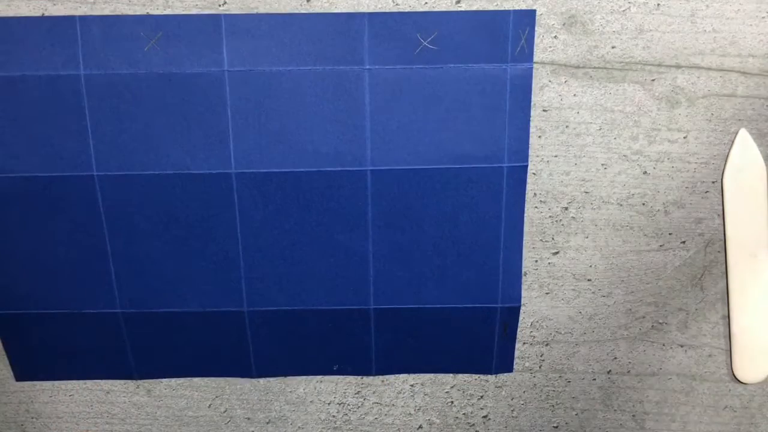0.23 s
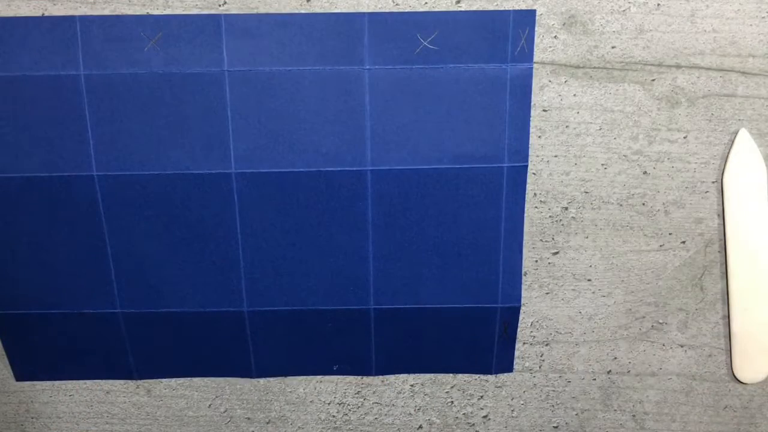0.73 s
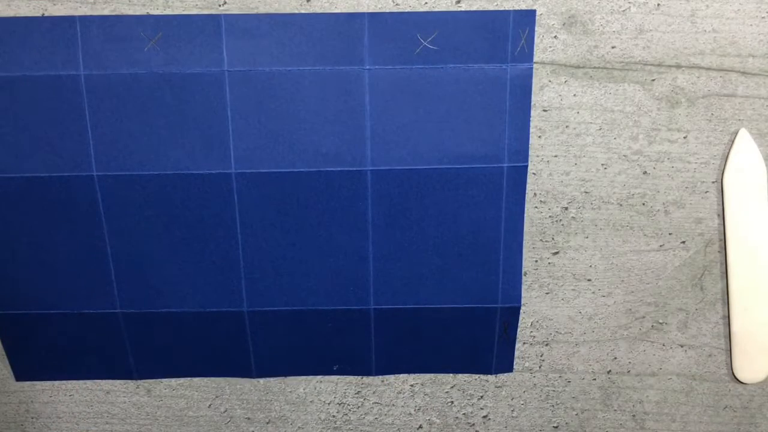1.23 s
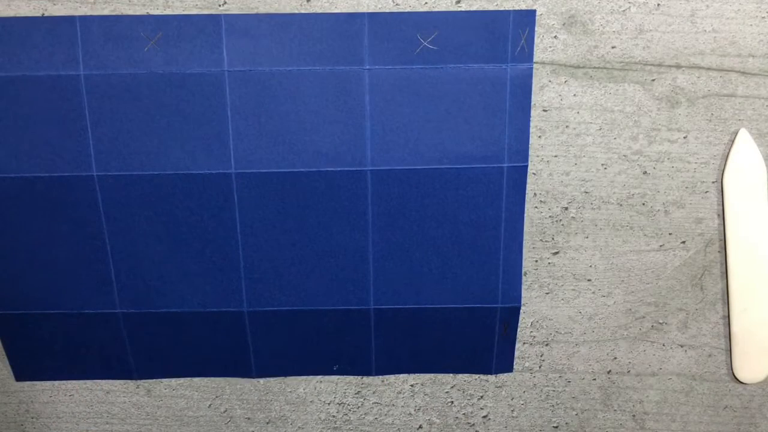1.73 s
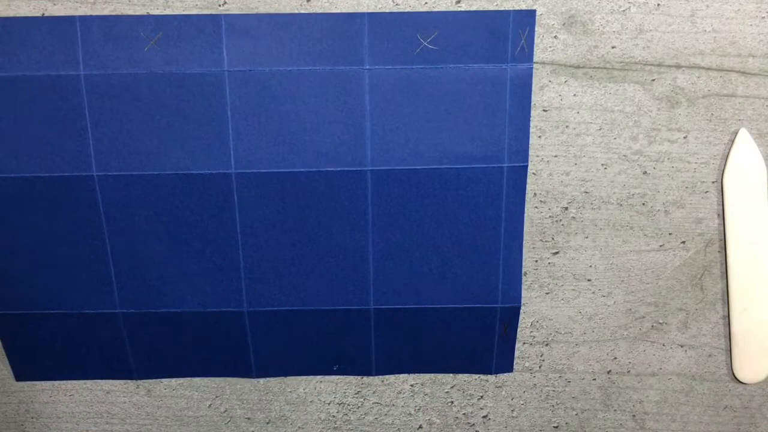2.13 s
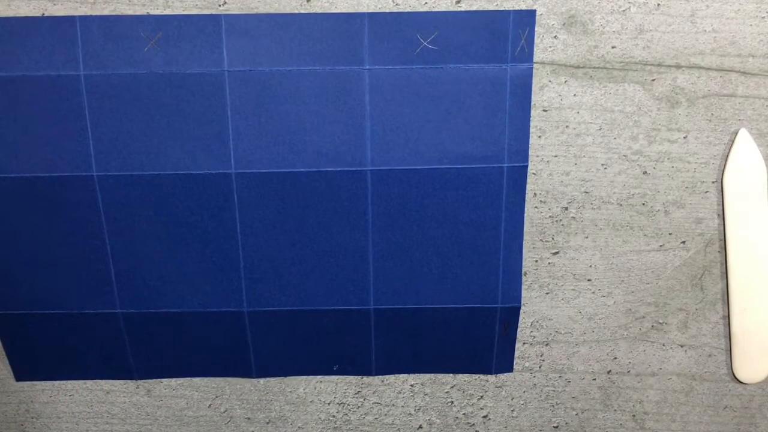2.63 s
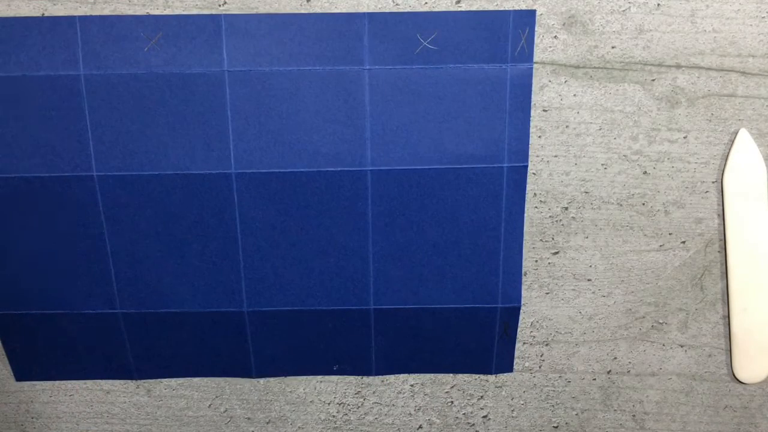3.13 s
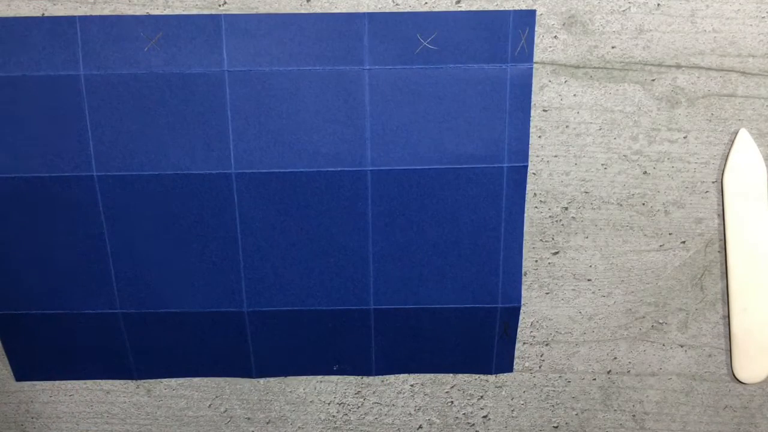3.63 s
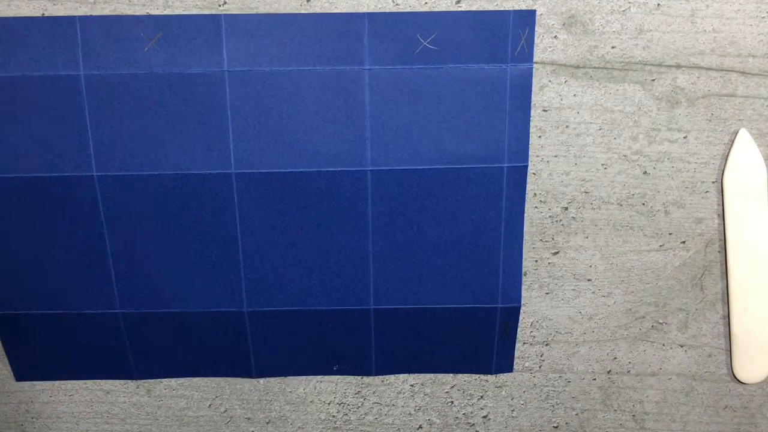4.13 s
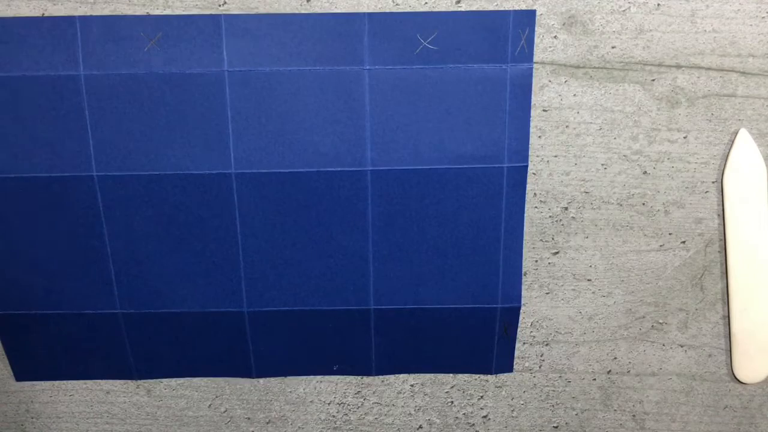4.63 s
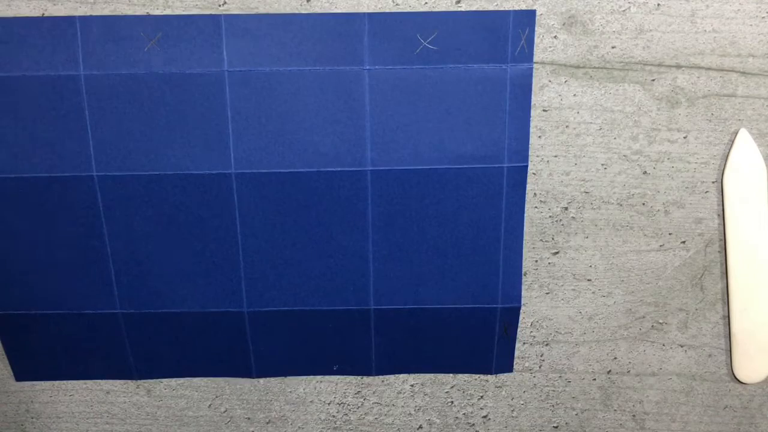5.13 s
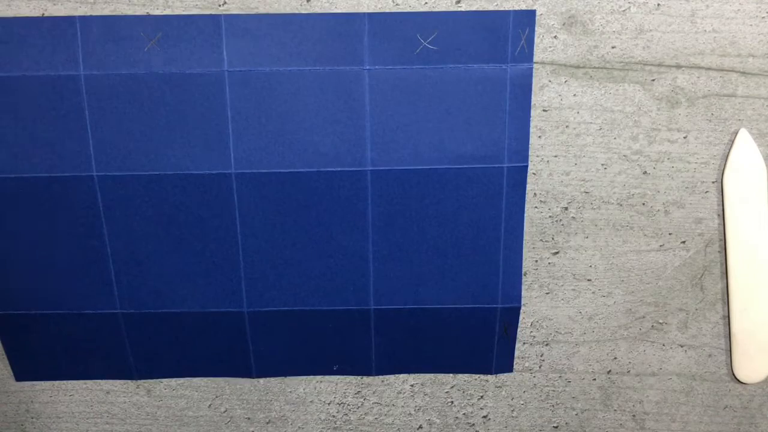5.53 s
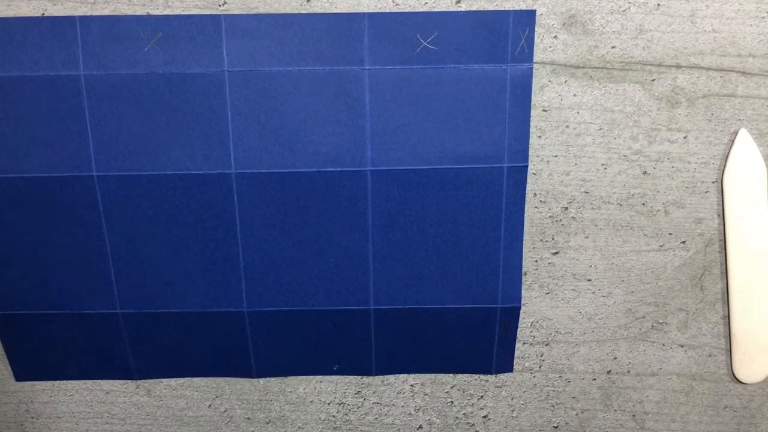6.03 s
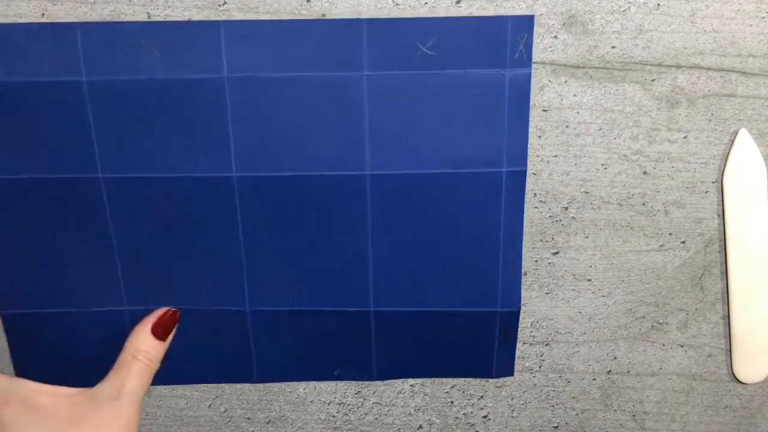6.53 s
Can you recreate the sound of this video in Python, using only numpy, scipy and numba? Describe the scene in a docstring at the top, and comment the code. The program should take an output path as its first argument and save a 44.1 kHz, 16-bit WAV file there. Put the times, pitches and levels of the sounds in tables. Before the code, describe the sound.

A short steel rasp fades, returns and ends in a dry knock. Nearly three seconds of soft rustle pass, then a cluster of knocks and soft thumps leads to a quick metallic shear and ringing clinks as scissors are put down. Small ticks dot the quiet, faintly humming room. Finally stiff card is brushed, shifted and lifted with a hard snap, heard close.

```python
"""Steel scissors are handled, knocked and set down on a desk beside a sheet of stiff card, near a phone.
Knocks are dying noise rattles through a clack resonance; clinks also ring damped blade modes.
Soft pushes thump the desk modes; rubs are grainy noise in bands; scrape, shear, swish and slide are
noise through steep resonances. A small room echoes, over shaped noise and wandering machine hums."""
import sys
import numpy as np
from scipy import signal
from scipy.fft import rfft, irfft
from scipy.io import wavfile
from scipy.ndimage import uniform_filter1d
from numba import njit

SR = 44100
rng = np.random.default_rng(int(sys.argv[2]) if len(sys.argv) > 2 else 0)


def unload_audio(sound):
    """Save the sound as a 16-bit wav file, at the path given as the first command line argument."""
    columns = np.transpose(np.atleast_2d(sound))
    # keep every value between -1 and 1, then stretch to whole-number steps
    steps = np.round(np.clip(columns, -1, 1) * 32767)
    wavfile.write(sys.argv[1], SR, steps.astype(np.int16))


N = 298557

# six bands from rumble to top treble: low_hz, high_hz
BAND_EDGES = [(95, 450), (650, 1300), (1300, 2600), (2600, 5000), (5000, 9000), (9000, 15000)]

# room hiss and rumble, before the whole is set to AIR_DB: freq_hz, relative_density_db
AIR_COLOUR = [(18, -34.5), (30, 1), (53, 3), (140, -6.5), (173, -6.5), (263, -21.5), (299, -21),
              (410, -22.5), (443, -16.5), (874, -23.5), (1080, -22.5), (1360, -26.5), (3150, -32.5),
              (4090, -31.5), (15500, -40)]
AIR_DB = -55  # rms
# machine hums: pitch_hz, drift_hz (phase drift setting, about four times the line width), level_db (rms)
MACHINE_HUMS = [(166.1, 1.1, -60), (118, 14, -71), (47, 4.7, -66.5)]
ROOM_DB, ROOM_T60_S, ROOM_TREBLE_T60_S = -20, 0.17, 0.4

# desk top modes: pitch_hz, gain_db, t60_s
DESK_MODES = [(98, -7.5, 0.089), (130, -1.5, 0.12), (214, -0.5, 0.043), (310, -4, 0.027)]
# soft thumps of hand and handles on the desk: start_s, push_db (before the desk modes)
DESK_THUMPS = [(0.2392, -39), (0.2533, -47), (.2922, -48), (0.307, -47), (1.053, -54), (2.9686, -45),
               (3.0141, -44), (3.0846, -38.5), (3.1138, -35), (3.2126, -27), (3.236, -34.5), (3.33, -36),
               (3.362, -39.5), (3.477, -43.5), (3.6766, -42), (3.6814, -42.5), (3.7384, -44),
               (5.0605, -52.5), (5.903, -53), (6.4574, -40.5), (6.5078, -44), (6.5416, -36.5),
               (6.7115, -31), (6.727, -50)]

# card, fingers and sleeve rubbing:
# loudest_s, swell_s, fade_s, level_db, tilt_db (per band), desk_rumble_db
CARD_RUBS = [(.003, 0.022, 0.051, -49, -6.5, -42.5), (.06, 0.044, 0.098, -56.5, -1.5, -53),
             (0.259, 0.026, 0.11, -38.5, -6.5, -44), (.34, .06, .16, -53, -6.5, -54),
             (.56, 0.013, 0.069, -61, -4, -69), (.67, 0.041, 0.078, -75.5, 5.5, -74),
             (1.26, 0.18, 0.054, -70.5, 3, -70), (1.52, 0.18, 0.098, -72, 2, -77),
             (1.845, 0.059, 0.18, -65.5, 0, -56.5), (3.021, 0.06, 0.095, -44.5, -6, -41.5),
             (3.089, 0.018, 0.11, -39.5, -5, -40.5), (3.26, 0.13, 0.097, -46.5, -6.5, -45),
             (3.37, 0.055, .06, -54, -6, -43), (3.43, 0.052, 0.056, -49.5, -6, -57),
             (3.484, 0.11, 0.053, -48, -4.5, -40), (3.56, 0.078, 0.13, -54, -4, -48.5),
             (3.739, 0.14, 0.18, -44, -7.5, -49.5), (4.11, 0.16, 0.18, -60, -5.5, -52.5),
             (4.57, 0.27, 0.093, -73, 1.5, -60), (4.83, .1, 0.36, -68.5, -0.5, -57),
             (5.1, 0.13, 0.18, -62.5, 1, -62), (5.33, .1, 0.21, -74.5, 4.5, -69.5),
             (5.64, 0.24, 0.21, -66, 1.5, -67), (6.0, .05, .08, -69.5, 1.5, -61.5),
             (6.49, 0.035, 0.067, -48, -2, -60), (6.535, 0.062, 0.13, -48, -2.5, -45.5),
             (6.67, 0.058, 0.025, -47, -2, -60), (6.76, 0.1, .05, -45.5, -0.5, -45.5)]
# rub colour, one value a band: body_db, low_middle_db, high_middle_db, treble_db, top_treble_db
RUB_COLOUR = [-3, -2.5, 0, -5, -4.5]
# faint stirring between the rubs, same five bands: level_db
RUSTLE_LEVELS = [-79, -77.5, -83, -81, -86.5]
RUB_EDGE_DB, RUB_CURVE = -20, 1.34  # drop after one swell or fade time, and how rounded the top is
RUSTLE_WANDER_DB, RUMBLE_DB = 4.5, -62.5  # dB per unit of walk, and resting desk rumble
CARD_HZ, CARD_WIDTH_HZ, CARD_DB = 794.0, 178.0, 4.52  # the sheet's hollow note over the desk

# a fingertip swishes over the card, its hollow opening and closing: time_s, level_db, main_pitch_hz
SWISH_PATH = [
    [(6.265, -74, 7200), (6.283, -45.5, 6750), (6.31, -45.5, 6000), (6.325, -55, 6600), (6.335, -51, 7800),
     (6.365, -52, 6760), (6.385, -47, 5650), (6.405, -59, 4760)],
]
# swish resonances at the reference pitch: pitch_hz, width_hz (each of two passes), relative_db
SWISH_RESONANCES = [(2400, 700, -11), (3900, 1000, -8), (5200, 1000, -8), (6800, 1600, 0), (9000, 2200, -6),
                    (12500, 4000, -10)]
# the sheet slides and lifts, its hollow note rising: time_s, level_db, main_pitch_hz
SLIDE_PATH = [
    [(6.565, -53, 900), (6.6, -47, 970), (6.635, -47, 1320), (6.655, -53, 2100), (6.675, -38, 2650),
     (6.69, -54, 2700)],
]
# slide resonances at the reference pitch: pitch_hz, width_hz (each of two passes), relative_db
SLIDE_RESONANCES = [(2000, 1000, 0.5), (2900, 1200, -5), (3900, 2000, -8)]
SWISH_HZ, SLIDE_HZ = 6800, 2000  # reference pitches of the two main resonances

# blades scraping along each other: time_s, level_db
SCRAPE_PATH = [
    [(0, -36), (.015, -39.5), (.05, -55)],
    [(.1, -52), (.118, -44.5), (.14, -37), (.165, -39.5), (.2, -39.5), (.232, -38)],
]
# hollow colour of the scrape: pitch_hz, width_hz (each of two passes), relative_db
SCRAPE_RESONANCES = [(207.5, 100, -2), (730, 420, -4), (1250, 260, 4), (1670, 60, -1), (1850, 180, -0.5),
                     (2500, 410, -2.5), (3000, 440, -4), (3900, 400, -12), (4400, 350, -10),
                     (6100, 700, -12), (7300, 410, -9.5), (10700, 1700, -14), (13400, 900, -20)]
# the blades close fast just before a burst of clinks: time_s, level_db
SHEAR_PATH = [
    [(3.61, -50), (3.625, -33), (3.641, -24.5), (3.65, -32.5), (3.657, -42)],
]
# colour of the closing blades: pitch_hz, width_hz (each of two passes), relative_db
SHEAR_RESONANCES = [(895, 170, -9.5), (1980, 630, -3.5), (3850, 420, 3), (4370, 400, -6),
                    (6100, 1500, -3.5), (8000, 500, -16), (9400, 500, -11.5), (12800, 3000, -12.5)]

# scissor blade modes: pitch_hz, gain_db, t60_s
BLADE_MODES = [(840, -7, 0.056), (1048, -11, .17), (1900, -10.5, .13), (2250, -14.5, 0.13),
               (3460, -6.5, .1), (3450, -15, .4), (3560, -14.5, .3), (3530, -8.5, .1), (3730, -9.5, 0.064),
               (4390, -13, .15), (5440, -13, .14), (6780, -13.5, .1), (10300, -17, 0.046),
               (12900, -15, .05)]
# dry knocks and ticks of card and handles: start_s, level_db (peak of crack and clack together),
# body_db and treble_db (over that peak, 6 dB is added to both), clack_hz, clack_db (over crack), rattle_ms
DRY_KNOCKS = [(0.2399, -7.5, -22.5, -11.5, 1290, -3.5, 5.9), (0.254, -21, -16, -21, 1640, -9, 5.5),
              (0.2743, -22, -22, -23, 2540, -3, 4.5), (0.292, -18.5, -34, -17, 1760, -12, 2.8),
              (0.3054, -24, -27, -34, 1680, -4, 11), (0.317, -41, -20, -6, 1600, -8, 3),
              (0.5474, -52, -17, -6, 2550, 1, 3.5), (0.5548, -45, -28, -26, 1510, 14, 14),
              (1.053, -54.5, 1, -19, 2800, 6, 20), (1.2234, -73, -3, 8, 4600, -9, 5),
              (1.2697, -54, -1, -8, 1980, 12, 6.8), (1.512, -42.5, -24, -33, 1960, -8, 2.3),
              (2.1106, -53, -31, 2, 5300, -7, 4.5), (2.1892, -40, -35.5, -14.5, 4600, 3, 3.3),
              (2.9579, -37, -4, -14, 1890, -9, 4.9), (2.968, -34, -16, -4.5, 1860, -4, 6.9),
              (2.9911, -29.5, -6, -8, 2040, -12, 7.4), (3.0135, -26, -25, -15, 1620, -5, 11),
              (3.0306, -27.5, -28, -19, 2410, -5, 10), (3.0835, -14.5, -21.5, -5, 3140, -10, 6.8),
              (3.1023, -21.5, -15, -10, 3920, -6, 7.7), (3.114, -21.5, -16, -9.5, 3140, -1, 5.9),
              (3.142, -25.5, -16.5, -15, 3290, 1, 4.9), (3.1663, -31, -18, -19, 3360, -3, 3),
              (3.1874, -38.5, -17, -30, 3490, -1, 4.6), (3.2112, -47.5, 15, -22, 1040, 4, 5.2),
              (3.236, -29, -16, -21, 1750, -4, 7.5), (3.2591, -26.5, -29, -38, 1570, 3.5, 10),
              (3.2804, -26.5, -23, -19, 1550, -2, 6.3), (3.331, -57, 15, -19, 1590, 0, 4.5),
              (3.361, -60.5, 20.5, -22, 1340, -1, 30), (3.477, -32, -10, -27, 1030, -5, 16),
              (3.4926, -25, -39, -23, 1620, 3, 4), (3.5414, -39.5, -10, -16, 1400, -3, 5),
              (3.5858, -32.5, -18, -14, 1650, 2, 7.4), (3.8594, -51, -2, -54, 3640, -1, 4),
              (3.8894, -35.5, -31, -22, 1950, -1, 4.5), (3.9265, -38.5, -19, -28, 1950, 3, 5),
              (4.0374, -40.5, -13, -19, 1560, 8, 2.3), (4.57, -44.5, -25.5, -5.5, 4350, -2, 6.7),
              (4.9745, -54, -2.5, -2, 1750, -2, 5.3), (5.0587, -50, -5.5, 6, 3180, 1, 5.6),
              (5.3207, -69, 14.5, 0, 1180, 3, 5), (5.5395, -51, -28, -13, 4800, 6, 4),
              (5.6633, -46.5, -26, 0.5, 4170, 0, 5.7), (5.682, -45.5, -29, -5.5, 2420, -4, 4),
              (5.903, -37.5, -41, 0, 1125, -1.5, 4.6), (5.9913, -44, -25, -3, 4610, 1.5, 3.1),
              (6.1484, -56.5, -26, -1, 1680, -6, 2.6), (6.4574, -31, -14, -11.5, 1400, -7, 5.3),
              (6.4777, -30, -13, -29, 1960, 8, 4.4), (6.5273, -29.5, -21, -18, 1580, -3, 9.4),
              (6.5404, -35, -7.5, -28, 1800, 2, 9.1), (6.5636, -46.5, 6, -19, 2510, 0, 7),
              (6.7277, -4.5, -53, -21.5, 2295, 8.5, 2.8)]
# clinks that also ring the blades: the knock columns, then blade_ring_db (before the mode gains)
BLADE_CLINKS = [(3.6629, -8, -42, -7, 3320, 0, 21, -33), (3.6764, -9, -50, -10.5, 3590, 11.5, 8.4, -39),
                (3.6807, -16.5, -22, -1, 3400, -10, 9.3, -28), (3.6894, -34.5, 5, 9, 3400, -10, 17, -22),
                (3.697, -15.5, -40, -7, 3100, -8, 10, -34), (3.7194, -18, -9, -9.5, 1960, 1, 11, -41),
                (3.7399, -16.5, -17, -5.5, 3700, -23, 9.8, -25),
                (3.7727, -25, -30, -11, 3580, -11, 18, -55), (4.0479, -38, -5, -13, 3030, -4, 7.1, -54),
                (4.0617, -33.5, -7, -26, 1950, -7, 9.1, -45), (4.0894, -41, -29, -20, 3380, -7, 6.2, -46),
                (4.1096, -28, -35, -11.5, 1900, 0.5, 6.6, -42),
                (4.1154, -31, -29, -18, 3460, 1.5, 3.2, -48), (4.1458, -37, -16.5, -22, 1820, 12, 7, -53.5),
                (4.1545, -34, -10.5, -14.5, 3320, -3, 11.6, -55)]
CLACK_T60_S, TOP_UNDER_TREBLE_DB = 0.014, -9.5
ATTACK_S, SPIKE, SPIKE_DECAY_S = 0.00052, 2.4, 0.00025  # rattle onset; spike gain over the rattle

# phone colour, two dips and a lift: pitch_hz, width_hz, share_added (plain gain)
PHONE_COLOUR = [(7700, 1200, -0.36), (10400, 770, -0.26), (13000, 2900, .4)]
BOTTOM_HZ, TOP_HZ = 39.4, 15800


def undb(db):
    """Decibels to gain."""
    return 10 ** (np.asarray(db) / 20)


def unit(x):
    """Scale to rms 1."""
    return x / np.sqrt(np.mean(x ** 2))


def peak(x):
    """Scale to peak 1."""
    return x / np.max(np.abs(x))


def band(x, k):
    """One of the six bands; signs alternate so that neighbours add."""
    sos = signal.butter(2, BAND_EDGES[k], "bandpass", fs=SR, output="sos")
    return (-1) ** k * signal.sosfilt(sos, x)


def ring(x, modes):
    """Damped modes driven by x, each a decaying sine."""
    out = 0
    for hz, db, t60 in modes:
        pole = np.exp(2j * np.pi * hz / SR - np.log(1000) / (t60 * SR))
        out = out + undb(db) * signal.lfilter([1], [1, -pole], x).imag
    return out


def walk(rate):
    """Random levels held 1 / rate s and slewed twice; spread about 0.7."""
    hold = int(SR / rate)
    steps = np.repeat(rng.standard_normal(N // hold + 1), hold)
    return uniform_filter1d(uniform_filter1d(steps, hold), hold)[:N]


@njit
def svf(x, hz, width):
    """State-variable band-pass with a moving centre, gain 1 there."""
    y, b, l = np.empty(len(x)), 0., 0.
    for i in range(len(x)):
        g, k = np.tan(np.pi * hz[i] / SR), width / hz[i]
        v = (b + g * (x[i] - l)) / (1 + g * (g + k))
        b, l, y[i] = 2 * v - b, l + 2 * g * v, k * v
    return y


def room_air():
    """Steady hiss and rumble of the room, with narrow hums of a distant machine."""
    freq_hz = np.maximum(np.fft.rfftfreq(N, 1 / SR), 1)
    points_hz, points_db = np.array(AIR_COLOUR).T
    colour = undb(np.interp(np.log(freq_hz), np.log(points_hz), points_db))
    out = undb(AIR_DB) * unit(irfft(rfft(rng.standard_normal(N)) * colour, N))
    for hz, drift_hz, db in MACHINE_HUMS:
        # a tone whose phase wanders; the more drift, the noisier
        drift = np.cumsum(rng.standard_normal(N)) * np.sqrt(2 * np.pi * drift_hz / SR) * .5
        phase = 2 * np.pi * hz * np.arange(N) / SR + uniform_filter1d(drift, size=400)
        out = out + undb(db + 0.4 * walk(6)) * np.sqrt(2) * np.sin(phase)
    return out


def walls(x):
    """Diffuse echo of a small furnished room: decaying noise whose treble lingers longest."""
    t = np.arange(SR // 2) / SR
    noise = rng.standard_normal(len(t)) * np.minimum(t / 0.0027, 1)
    low = sum(band(noise, k) for k in (1, 2, 3)) * undb(-60 * t / ROOM_T60_S)
    treble = (band(noise, 4) + band(noise, 5)) * undb(-60 * t / ROOM_TREBLE_T60_S)
    tail = low + treble
    return undb(ROOM_DB) * signal.fftconvolve(x, tail / np.sqrt(np.sum(tail ** 2)))[:N]


def desk_thumps():
    """Hand and handles push the desk top softly and its low modes ring."""
    push = np.zeros(N)
    width = int(.001 * SR)  # a 1 ms push
    for s, db in DESK_THUMPS:
        at = int(s * SR)
        push[at:at + width] += undb(db) / width
    return band(ring(push, DESK_MODES), 0)


def slips(grain_db, flicker_db):
    """Fibres and edges catch and slip: noise with fast grain and slower flicker."""
    return rng.standard_normal(N) * undb(grain_db * walk(400) + flicker_db * walk(72))


def streaks(x, patchy_db):
    """Random uneven colour for rubs and knocks: patches a few hundred Hz wide, some 40 ms long."""
    spec = signal.stft(x, nperseg=256)[2]
    patches = uniform_filter1d(rng.standard_normal(spec.shape), size=2, axis=0)
    patches = uniform_filter1d(patches, size=14, axis=1)
    return signal.istft(spec * undb(patchy_db * unit(patches)), nperseg=256)[1][:len(x)]


def body(x):
    """The low band of a touch, ringing in the hollow under the card."""
    return band(x, 1) + undb(CARD_DB) * svf(x, np.full(len(x), CARD_HZ), CARD_WIDTH_HZ)


def rubbing():
    """Card and fingers: each rub swells and fades, duller or brighter, and the desk rumbles under it."""
    t = np.arange(0, N + 64, 64) / SR  # coarse clock for the envelopes
    loudest, swell, fade, db, tilt_db, desk_db = np.array(CARD_RUBS).T[:, :, None]
    distance = np.where(t < loudest, (loudest - t) / swell, (t - loudest) / fade)
    shape_db = RUB_EDGE_DB * distance ** RUB_CURVE

    def gain(rub_db, rest_db):
        """Powers of all rubs and the resting level add."""
        rubs = np.linalg.norm(undb(rub_db + shape_db), axis=0)
        return np.hypot(np.interp(np.arange(N) / SR, t, rubs), undb(rest_db))

    grain = streaks(slips(grain_db=1.0, flicker_db=2.0), patchy_db=3.5)
    rumble = unit(band(ring(rng.standard_normal(N), DESK_MODES), 0))
    out = gain(desk_db, RUMBLE_DB + RUSTLE_WANDER_DB * walk(8)) * rumble
    for k, (colour_db, rest_db) in enumerate(zip(RUB_COLOUR, RUSTLE_LEVELS)):
        part = band(grain, k + 1) if k else body(grain)
        rub_db = db + colour_db + (k - 1) * tilt_db  # tilt pivots on the low middle
        out = out + gain(rub_db, rest_db + RUSTLE_WANDER_DB * walk(11)) * unit(part)
    return out


def curve(paths):
    """Level of several strokes along the whole time, down at -95 dB between strokes."""
    rows = []
    for path in paths:
        rows.append((path[0][0] - .012, -95))
        rows += [point[:2] for point in path]
        rows.append((path[-1][0] + .012, -95))
    return np.interp(np.arange(N) / SR, *np.array(rows).T)


def glide(paths, rest_hz):
    """Pitch factor of a stroke whose main resonance moves."""
    s, _, main_hz = np.transpose(paths[0])
    return np.interp(np.arange(N) / SR, s, main_hz) / rest_hz


def stroke(paths, resonances, grain_db, flicker_db, pitch=1):
    """A sliding stroke: grainy noise through the steep resonances of what slides."""
    grain, colour = slips(grain_db, flicker_db), 0
    for hz, width, db in resonances:
        centre = np.clip(hz * pitch * np.ones(N), 100, .4 * SR)
        once = svf(grain, centre, 1. * width)
        colour = colour + undb(db) * unit(svf(once, centre, 1. * width))
    return undb(curve(paths)) * unit(colour)


def swish():
    """A fingertip excites the card's hollow while its resonances move together."""
    pitch = glide(SWISH_PATH, SWISH_HZ)
    return stroke(SWISH_PATH, SWISH_RESONANCES, grain_db=1.5, flicker_db=0.5, pitch=pitch)


def slide():
    """The sheet slides and lifts, so its hollow note rises."""
    pitch = glide(SLIDE_PATH, SLIDE_HZ)
    return stroke(SLIDE_PATH, SLIDE_RESONANCES, grain_db=1.5, flicker_db=2.0, pitch=pitch)


def scrape():
    """Blades catch and slip along each other with a fixed hollow colour."""
    return stroke(SCRAPE_PATH, SCRAPE_RESONANCES, grain_db=2.0, flicker_db=2.0)


def shear():
    """The blades close fast, a short rougher stroke of steel."""
    return stroke(SHEAR_PATH, SHEAR_RESONANCES, grain_db=2.5, flicker_db=3.0)


def blade_ring():
    """The first contact of each clink strikes the steel and its damped modes ring."""
    strikes = np.zeros(N)
    for clink in BLADE_CLINKS:
        strikes[int(clink[0] * SR)] += undb(clink[-1])
    return ring(strikes, BLADE_MODES)


def knocks():
    """A first contact and a dying rattle of smaller ones excite a clack, the card's body and treble."""
    t = np.arange(4096) / SR
    out = np.zeros(N + len(t))
    for s, db, body_db, treble_db, clack_hz, clack_db, rattle_ms, *_ in DRY_KNOCKS + BLADE_CLINKS:
        decay = np.minimum(t / ATTACK_S, 1) * np.exp(-t * 1000 / max(rattle_ms, .3))
        contact = SPIKE * np.exp(-t / SPIKE_DECAY_S)
        rattle = streaks(rng.standard_normal(len(t)), patchy_db=4.0) * (decay + contact)
        clack = undb(clack_db) * peak(ring(rattle, [(clack_hz, 0, CLACK_T60_S)]))
        crack = peak(band(rattle, 2) + band(rattle, 3))
        treble = peak(band(rattle, 4)) + undb(TOP_UNDER_TREBLE_DB) * peak(band(rattle, 5))
        knock = peak(clack + crack)
        knock = knock + 2 * undb(body_db) * peak(body(rattle)) + 2 * undb(treble_db) * treble
        at = int(s * SR)
        out[at:at + len(t)] += undb(db) * knock
    return out[:N]


def scene():
    """Desk sounds, their echo and the room."""
    near = desk_thumps() + rubbing() + swish() + slide()
    near = near + scrape() + shear() + blade_ring() + knocks()
    return (near + walls(near) + room_air())[None]


def record(dry):
    """The phone colours the treble, cuts the deepest bass and the top."""
    wet = dry[0]
    for hz, width, share in PHONE_COLOUR:
        wet = wet + share * svf(dry[0], np.full(N, 1. * hz), 1. * width)
    wet = signal.sosfilt(signal.butter(4, BOTTOM_HZ, "highpass", fs=SR, output="sos"), wet)
    return signal.sosfilt(signal.ellip(10, .2, 70, TOP_HZ, fs=SR, output="sos"), wet)[None]


dry = scene()
out = record(dry)
unload_audio(out)
```